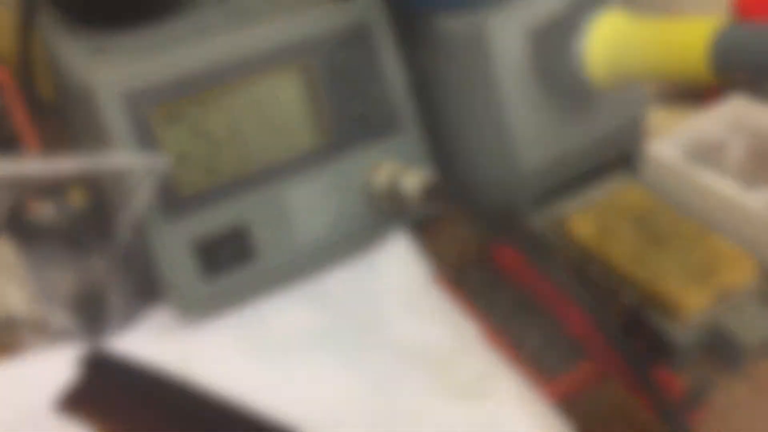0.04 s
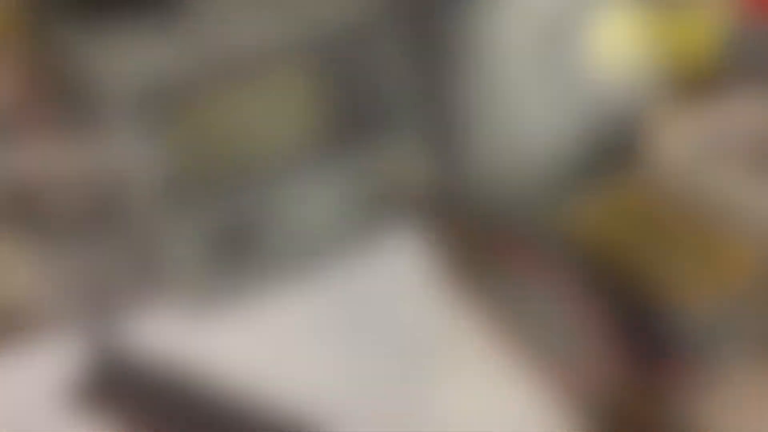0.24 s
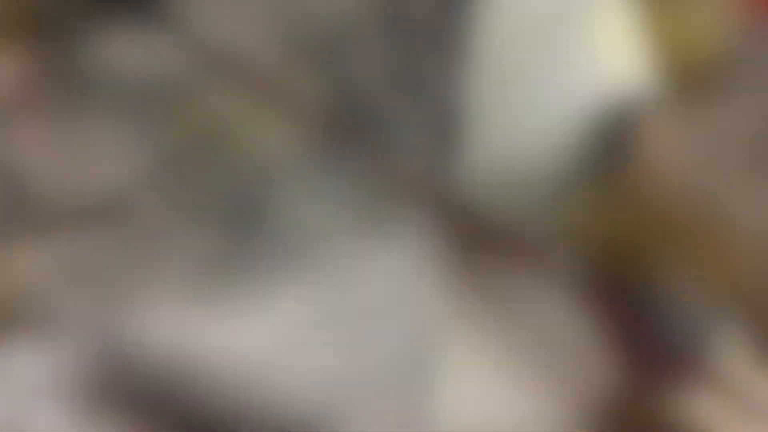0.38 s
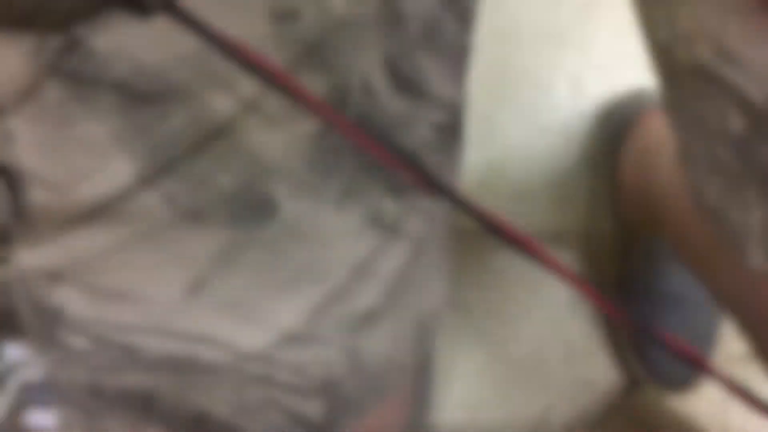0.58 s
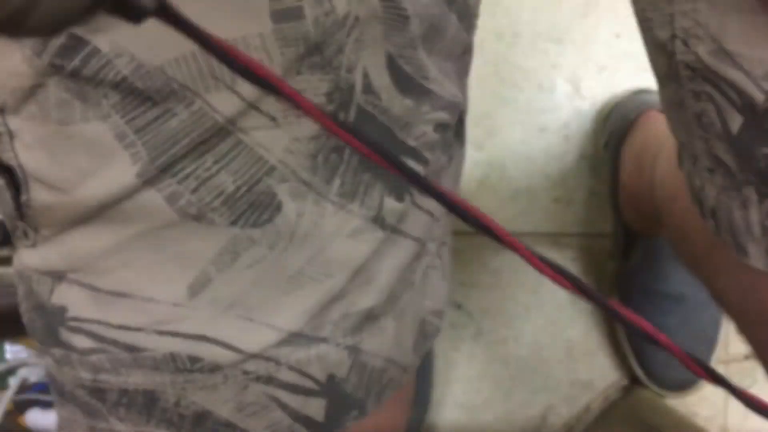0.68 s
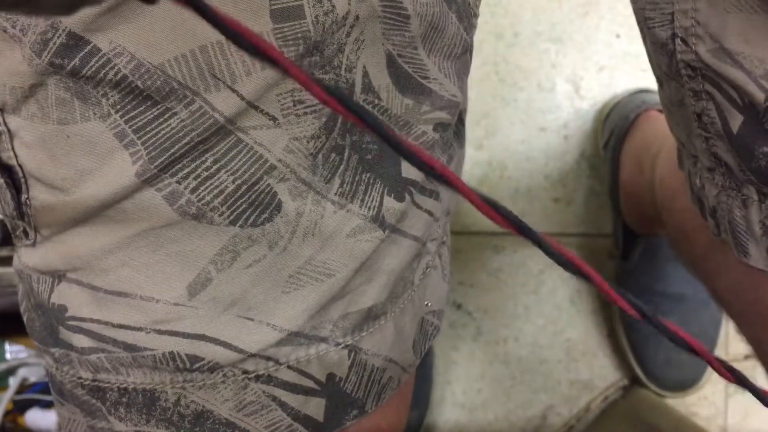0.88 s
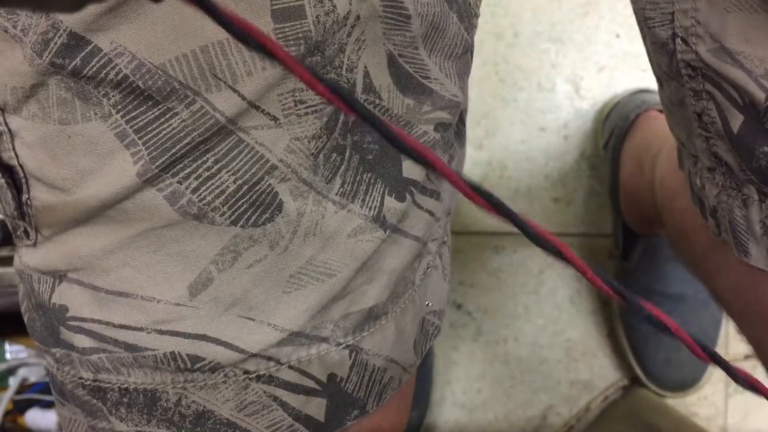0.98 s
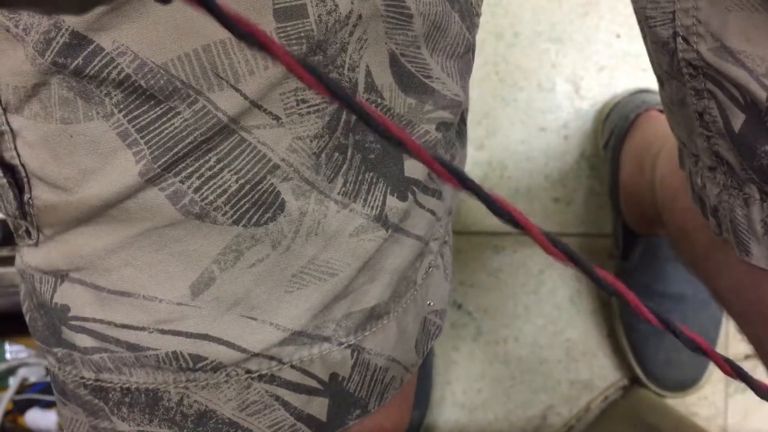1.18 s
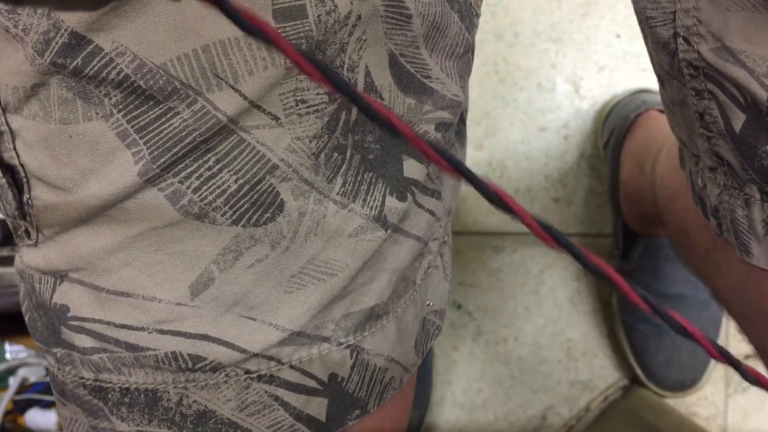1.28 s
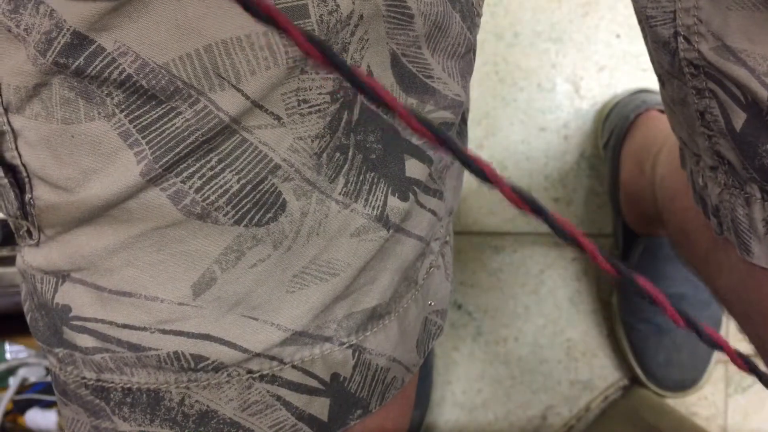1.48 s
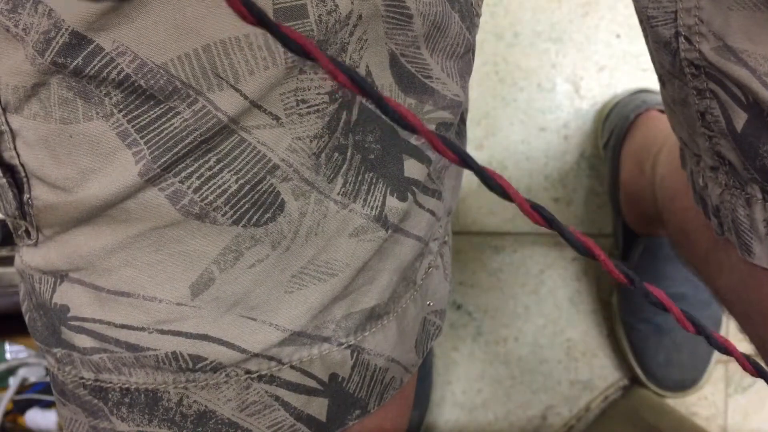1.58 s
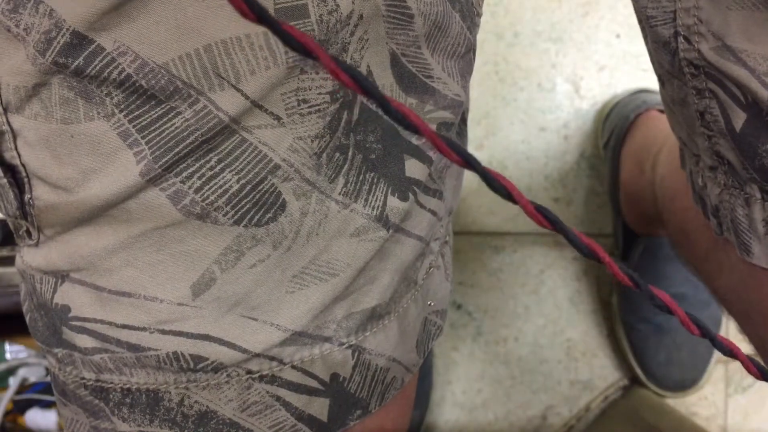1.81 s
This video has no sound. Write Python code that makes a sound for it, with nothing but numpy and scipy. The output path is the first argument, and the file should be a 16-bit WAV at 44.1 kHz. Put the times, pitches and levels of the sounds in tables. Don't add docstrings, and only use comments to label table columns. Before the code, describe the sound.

A small cordless drill motor whirs up, runs steadily with a buzzy whine, then stops dead.

```python
import sys
import numpy as np
from scipy import signal
from scipy.fft import rfft, irfft, next_fast_len
from scipy.io import wavfile
from scipy.ndimage import uniform_filter1d, map_coordinates

SR = 44100
rng = np.random.default_rng(int(sys.argv[2]) if len(sys.argv) > 2 else 0)


def wav_out(sig):
    wavfile.write(sys.argv[1], SR, np.round(np.clip(np.atleast_2d(sig).T, -1, 1) * 32767).astype(np.int16))


def field_ratio(decibels):
    return 10 ** (np.asarray(decibels, dtype=float) / 20)


N = 81585
T = np.arange(N) / SR

# (time [s], hum over rumble [dB])
HUM_OVER_RUMBLE = [(0, 12), (.2, 8), (.4, 3), (.7, -4), (1.3, 2), (1.7, -6), (1.85, -14)]
# (time [s], level [dB])
BACKGROUND = [(0, -63), (.06, -64.5), (.09, -88), (.125, -80), (.145, -67), (.23, -68.5), (.36, -73),
              (.55, -80.5), (.71, -77), (.8, -81), (.95, -79), (1.3, -82.5), (1.48, -80), (1.62, -86.5),
              (1.72, -93), (1.79, -77), (1.835, -78), (1.85, -75)]
# (frequency [Hz], width [Hz], level [dB])
ROOM_MODES = [(60.4, 28, -6.5), (154, 15, -0.5)]
# (frequency [Hz], level [dB per Hz])
AIR_SPECTRUM = [(25, -41), (70, -22.5), (150, -10.5), (350, -13), (1000, -27.5), (2500, -29.5),
                (5000, -36.5), (15500, -40.5)]
# (time [s], frequency [Hz], level [dB], half length [s])
TRIGGER_SOUNDS = [(.045, 1505, -73, .014), (.047, 3010, -75, .014), (.043, 4510, -82, .014),
                  (.063, 1850, -67, .011), (.081, 2110, -64, .008), (.086, 985, -63, .011),
                  (.061, 7400, -80, .004), (.088, 7000, -76, .004), (.102, 8100, -76, .004),
                  (1.572, 2280, -44, .007), (1.69, 1500, -78, .035), (1.838, 146, -72, .025)]
# (time [s], frequency of the 39th shaft order [Hz])
RUNNING_SPEED = [(.44, 12930), (.51, 12970), (.59, 12930), (.68, 12985), (.77, 12930), (.82, 12960),
                 (.95, 12890), (1.04, 12875), (1.12, 12815), (1.22, 12825), (1.3, 12780), (1.42, 12810),
                 (1.54, 12820)]
# (time [s], noise level [dB], then over it: mesh [dB], shaft tones [dB], current surge [dB])
DRILL_LEVELS = [(.04, -73.5, -30, -7, -30), (.085, -56, -43, -6, -28), (.115, -54, -17, -2, -10),
                (.14, -48, -19, -12, -8.5), (.165, -48.5, -40, -5, -15), (.22, -49, -10.5, -4, -26),
                (.265, -46.5, -14.5, 0.5, -11), (.4, -42.5, -11, 0.5, -15.5), (.7, -38, -9.5, 0, -40),
                (.95, -37.5, -10.5, 0, -14), (1.25, -38, -10, 0.5, -46), (1.45, -37, -8.5, -1, -19),
                (1.553, -38, -10.5, -1, -16), (1.568, -35.5, -25, -13.5, -2), (1.595, -43, -44, -35, -7),
                (1.615, -50, -36, -32, -41), (1.65, -81, -30.5, -25, -36)]
# (order [turns], level [dB])
SHAFT_ORDERS = [(2, -24), (3, -16.5), (4, -22), (6, -20), (9, -15), (15, -22), (18, -26), (21, -18),
                (24, -27), (30, -24.5), (33, -29), (36, -27), (37, -28), (39, -17)]
# (multiple of the mesh rate [1], level [dB])
MESH_TONES = [(.5, -16), (1, 0), (2, -15), (4, -13)]
# (order [turns], level [dB])
SURGE_ORDERS = [(3, 0), (4, -13), (9, -17)]
# (frequency [Hz], level [dB per Hz])
NOISE_SPECTRUM = [(250, -31.5), (400, -20.5), (650, -14.5), (1100, -9.5), (3000, -10.5), (8000, -15.5),
                  (13000, -18), (15500, -25.5)]
# (frequency [Hz], width [Hz], level [dB])
HOUSING = [(1200, 67, -9), (2080, 150, -9), (3000, 250, 2), (3419, 70, 8.5), (3840, 170, 6), (4704, 300, 4),
           (5300, 100, 3.5), (5950, 67, 9), (6470, 83, 0), (8050, 300, -23.5), (9950, 430, -6.5),
           (12500, 360, -8)]
# (frequency [Hz], width [Hz], depth [0-1])
HOUSING_DIPS = [(3740, 120, 0.84), (10470, 760, 0.58)]
# (frequency [Hz], time to fall 60 dB [s])
ROOM_DECAY = [(200, .25), (400, .33), (1500, .34), (2500, .34), (3500, .27), (12000, .24)]


def unit(x):
    return x / np.sqrt(np.mean(x ** 2) + 1e-20)


def along(points, hz):
    f, v = np.transpose(points)
    return np.interp(np.log(hz + 1), np.log(f + 1), v, left=v[0], right=v[-1])


def curves(rows):
    times, *columns = np.transpose(rows)
    return [np.interp(T, times, column) for column in columns]


def wobble(rate):
    knots = rng.standard_normal(int(N * 400 / SR) + 4)
    return map_coordinates(knots, [T * rate])


def filtered(x, response):
    size = next_fast_len(N + SR // 2)
    return irfft(rfft(x, size) * response(np.fft.rfftfreq(size, 1 / SR)), size)[..., :N]


def resonances(rows):
    def response(f):
        total = 0
        for k, (center, width, db) in enumerate(rows):
            mode = 1j * f * width / (center * center - f * f + 1j * f * width)
            total = total + (-1) ** k * field_ratio(db) * mode
        return total
    return response


def patchy(patchy_db):
    z = signal.stft(rng.standard_normal(N + 512), nperseg=256)[2]
    field = uniform_filter1d(rng.standard_normal(z.shape), 3, 0)
    field = unit(uniform_filter1d(field, 7, 1))
    return unit(signal.istft(z * field_ratio(patchy_db * field), nperseg=256)[1][:N])


def tones(rows, turns, flutter_db, rate, drift, fade_db=0):
    total = 0
    for order, db in rows:
        gain = field_ratio(db + flutter_db * wobble(rate) + order * fade_db)
        phase = 2 * np.pi * (order * turns + rng.random()) + drift * wobble(rate)
        total = total + gain * np.sin(phase)
    return total * np.sqrt(2)


def workshop():
    hum_hz, whine_hz, whine_db, floor_db = 198.5, 1848, -90, -81
    background_db, = curves(BACKGROUND)
    shift_db, = curves(HUM_OVER_RUMBLE)
    rumble = unit(filtered(rng.standard_normal(N), lambda f: resonances(ROOM_MODES)(f) ** 2))
    hum = unit(tones([(1, 0), (1.5, -14)], hum_hz * T, flutter_db=2, rate=20, drift=.4))
    low = field_ratio(-shift_db / 2) * rumble + field_ratio(shift_db / 2) * hum
    air = unit(filtered(patchy(patchy_db=-2.8), lambda f: field_ratio(along(AIR_SPECTRUM, f))))
    air_db = floor_db + 0.27 * (background_db - background_db.min())
    whine = field_ratio(whine_db + 1.51 * wobble(14)) * np.sin(2 * np.pi * whine_hz * T)
    return 0.6 * field_ratio(background_db) * low + field_ratio(air_db) * air + whine


def trigger():
    total = 0
    for time, hz, db, half in TRIGGER_SOUNDS:
        swell = field_ratio(db - 8.7 * ((T - time) / half) ** 2)
        total = total + swell * np.sin(2 * np.pi * hz * T)
    return total


def shaft_hz():
    start_s, spin_up_s, brake_s, stop_s = .079, .056, 1.554, .068
    running = curves(RUNNING_SPEED)[0] / 39
    hunting = 1 + .0009 * wobble(22)
    spin_up = 1 - np.exp(-np.maximum(T - start_s, 0) / spin_up_s)
    brake = 1 - np.clip((T - brake_s) / stop_s, 0, 1)
    return running * hunting * spin_up * brake


def housing(f):
    response = field_ratio(along(NOISE_SPECTRUM, f)) * np.sqrt(1 + abs(resonances(HOUSING)(f)) ** 2)
    for center, width, depth in HOUSING_DIPS:
        response = response * (1 - depth / (1 + ((f - center) / width * 2) ** 2))
    return response / (1 + (210 / (f + 1)) ** 4)


def brush_and_gear_noise(turns, speed):
    clatter_per_s, clatter_db, spread_db = 2200, -6, 10
    share = np.cumsum(speed) / SR
    beat_db = .8 * np.sin(2 * np.pi * 20.5 * share)
    beat_db += .7 * np.sin(2 * np.pi * 153.5 * share)
    beat_db += 1.1 * np.sin(2 * np.pi * turns)
    beat_db += 0.68 * wobble(7) + 0.38 * wobble(44.9)
    hits = (rng.random(N) < clatter_per_s / SR) * rng.choice([-1, 1], N)
    hits = hits * field_ratio(-spread_db * rng.random(N))
    source = field_ratio(beat_db) * (patchy(patchy_db=2.0) + field_ratio(clatter_db) * unit(hits))
    noise = unit(filtered(source, housing))
    low = filtered(noise, lambda f: 1 / (1 + (f / 3000) ** 2))
    return low + (noise - low) * np.maximum(speed, .15) ** 1.6


def shaft_tones(turns, speed):
    strong = dict(SHAFT_ORDERS)
    faint = [(k, -27.5 - .2 * k) for k in range(5, 47) if k not in strong]
    fade_db = -8 * np.maximum(.978 - speed, 0)
    orders = list(SHAFT_ORDERS) + faint
    whirr = tones(orders, turns, flutter_db=2.6, rate=30, drift=.5, fade_db=fade_db)
    return whirr + tones([(0.99, -17)], turns, flutter_db=1.4, rate=45, drift=0.38)


def drill():
    level_db, mesh_db, shaft_db, surge_db = curves(DRILL_LEVELS)
    hz = shaft_hz()
    speed = hz / hz.max()
    turns = np.cumsum(hz) / SR
    noise = brush_and_gear_noise(turns, speed)
    whirr = field_ratio(shaft_db) * shaft_tones(turns, speed)
    mesh_turns = 2.607 * turns
    mesh = field_ratio(mesh_db) * tones(MESH_TONES, mesh_turns, flutter_db=2.6, rate=50, drift=.5)
    surge = field_ratio(surge_db) * tones(SURGE_ORDERS, turns, flutter_db=.8, rate=40, drift=.2)
    at_rest = np.clip((1.67 - T) / 0.024, 0, 1)
    return field_ratio(level_db) * at_rest * np.array([noise, whirr + mesh + surge])


def room(x):
    hz, t, z = signal.stft(rng.standard_normal(SR // 2), SR, nperseg=256)
    decay = field_ratio(-60 * t / along(ROOM_DECAY, hz)[:, None])
    tail = signal.istft(z * decay, SR, nperseg=256)[1]
    delayed = np.pad(x, (300, 0))
    return signal.fftconvolve(delayed, tail / np.linalg.norm(tail))[:N]


def scene():
    wet_db, tones_wet = -11, .3
    noise, tonal = drill()
    direct = noise + tonal + trigger()
    reverb = field_ratio(wet_db) * room(noise + tones_wet * tonal)
    return np.tile(direct + reverb + workshop(), (2, 1))


def top_cut(x):
    return signal.sosfilt(signal.butter(12, 15680, fs=SR, output="sos"), x)


def record(dry):
    mix = filtered(dry, lambda hz: hz < 15700)
    return top_cut(mix)


dry = scene()
out = record(dry)
wav_out(out)
```